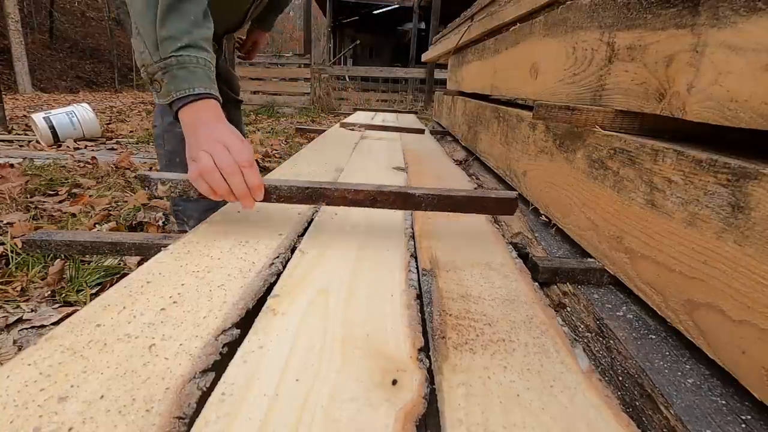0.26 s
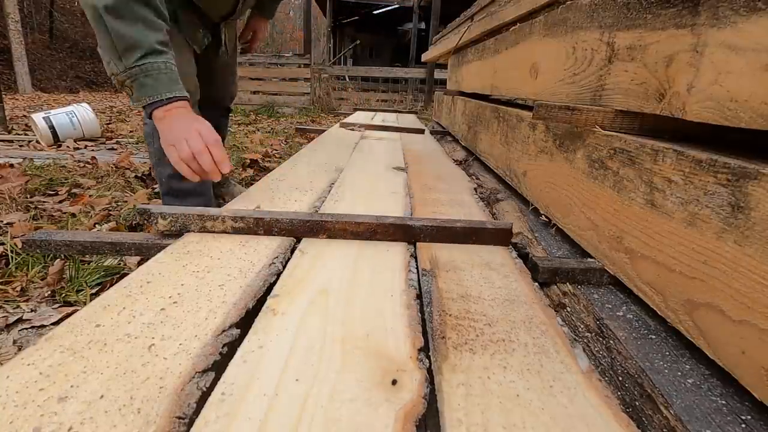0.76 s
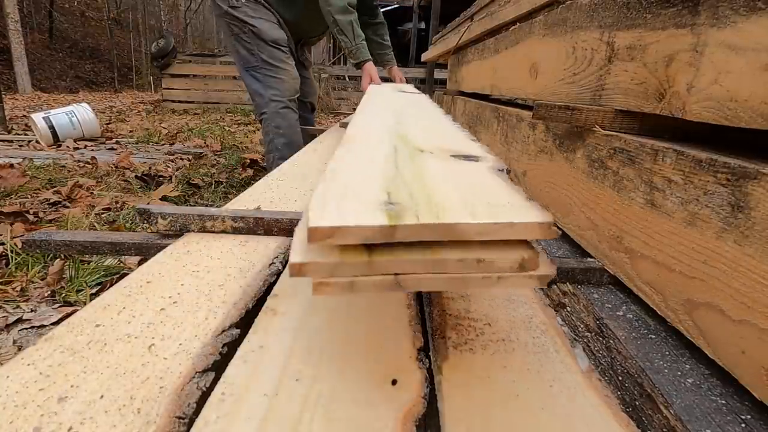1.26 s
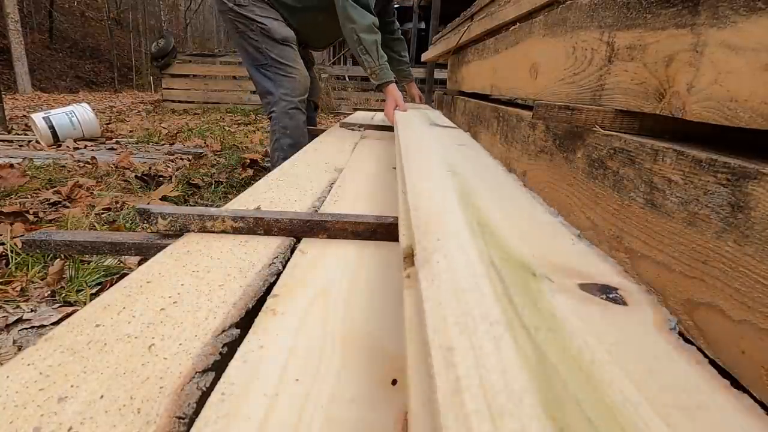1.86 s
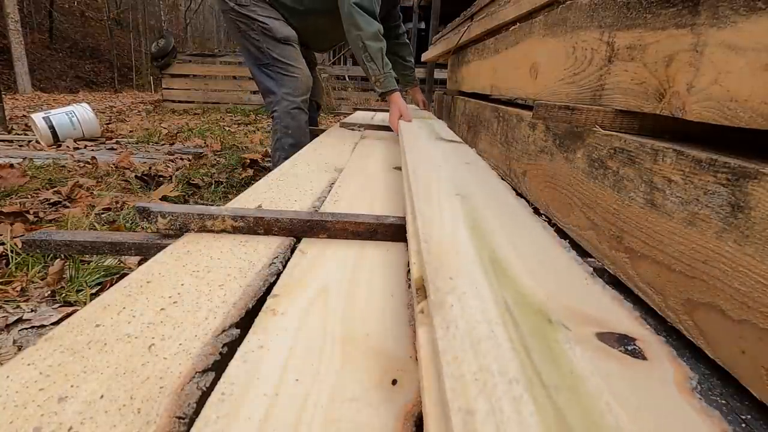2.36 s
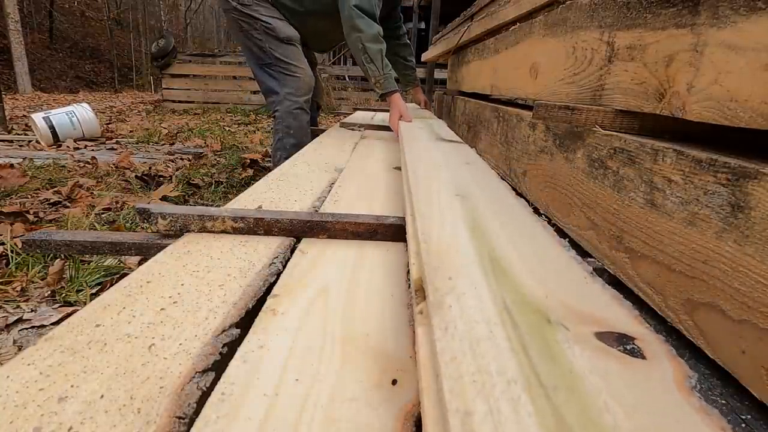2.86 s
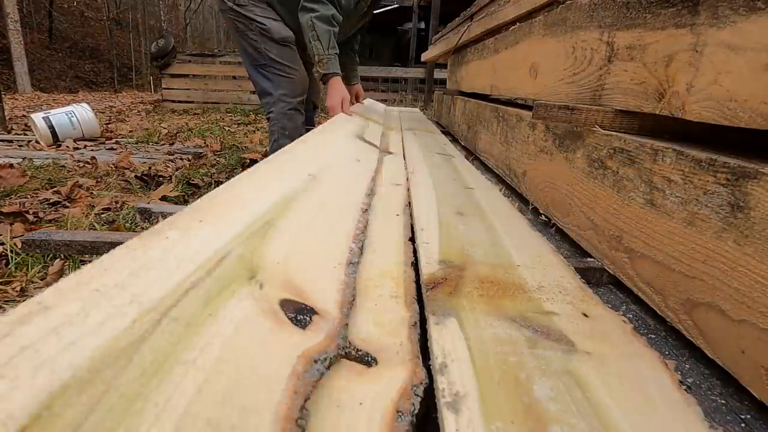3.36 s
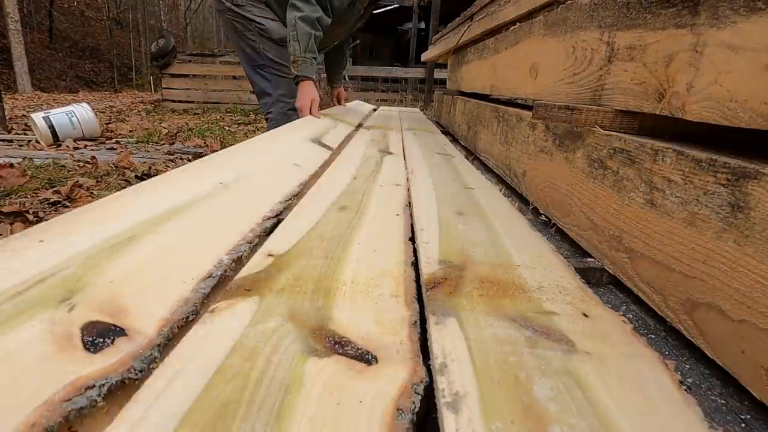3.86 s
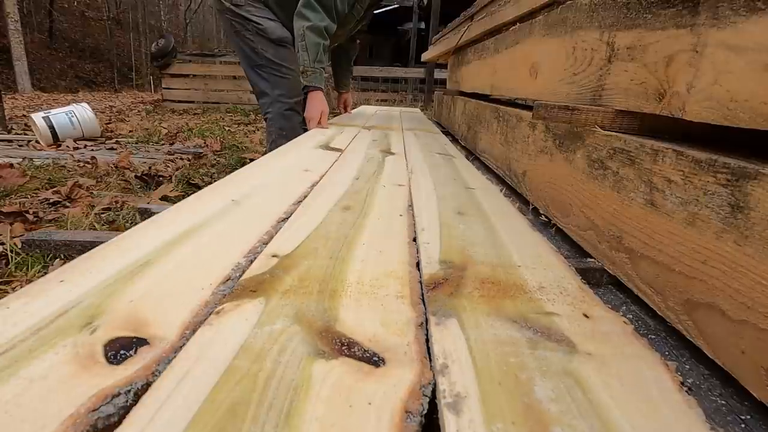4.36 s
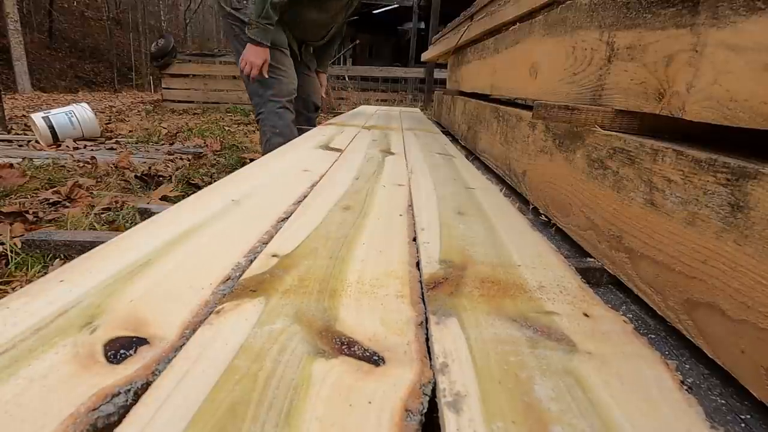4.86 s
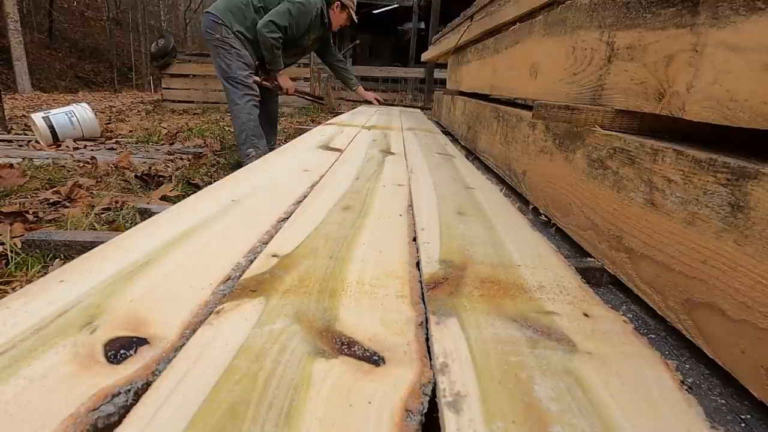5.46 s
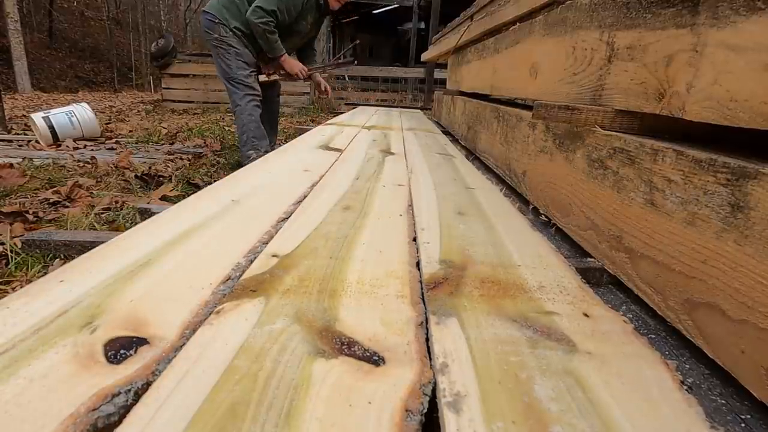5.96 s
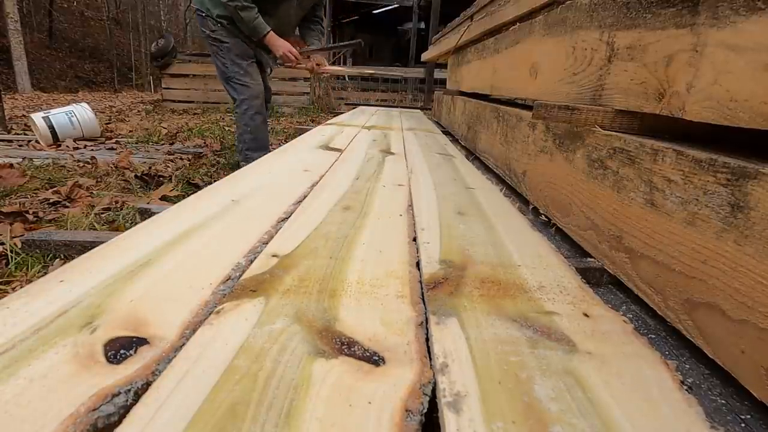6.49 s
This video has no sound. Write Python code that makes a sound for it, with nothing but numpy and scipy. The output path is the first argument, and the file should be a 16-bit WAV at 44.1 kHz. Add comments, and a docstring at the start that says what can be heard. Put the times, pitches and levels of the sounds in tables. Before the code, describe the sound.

Near the microphone, a wooden strip slaps onto boards with a quick cluster of knocks. Boots crackle in leaves and stalks snap. After near silence comes one crisp clack, a rough dry scrape swelling along the plank, then duller thuds as it drops and settles. Strips follow in two short clattering bursts, and the end fades to leaf crackle and small ticks in still, dry outdoor air.

```python
"""Sawn boards stacked by hand outdoors: wood blows ring bending modes through contact filters.
A spacer strip clatters down, a bundle is set on it, one plank scrapes sideways and drops, more strips land.
Scrapes are friction grains through the board's modes; slips are brief narrow noise rubs.
Boots crackle in dry leaves and cloth rustles (clumped grains), stalks snap (decaying noise bursts),
all over a steady hush of coloured noise."""
import sys
import numpy as np
from scipy import signal
from scipy.fft import rfft, irfft, next_fast_len
from scipy.io import wavfile
from scipy.ndimage import uniform_filter1d, minimum_filter1d, map_coordinates

SR = 44100
rng = np.random.default_rng(int(sys.argv[2]) if len(sys.argv) > 2 else 0)


def unload_wav(signal):
    """Save mono or channel-first audio to the path in sys.argv[1] as 16-bit WAV at rate SR, clipped to [-1, 1]."""
    wavfile.write(
        sys.argv[1],
        SR,
        np.round(np.clip(np.atleast_2d(signal).T, -1, 1) * 32767).astype(np.int16),
    )


N = 296793

# boots in dry leaves: (time [s], level [dB], length [s])
STEPS = [(0, -30, 0.056), (0.23, -50.5, 0.54), (0.859, -33.5, 0.12), (1.06, -42.5, 0.07),
         (1.288, -54, 0.22), (6.186, -41.5, .25), (6.473, -44.5, 0.35)]
STEP_ATTACK_S, STEP_FALL_DB_PER_S = 0.006, 104
# sleeves and trouser legs brushing: (time [s], level [dB], half length [s])
BRUSHES = [(.61, -44, 0.03), (.76, -48, 0.14), (5.02, -44.5, 0.083), (5.295, -40.5, 0.042),
           (5.39, -46.5, 0.21), (5.82, -53.5, 0.22), (6.04, -44.5, 0.038), (6.19, -47, 0.033)]
# colour of crushed leaves: (frequency [Hz], relative density [dB per Hz])
LEAF_COLOUR = [(60, -66), (150, -2), (260, 0.5), (580, 6.5), (950, -3.5), (1600, 0), (2300, 1),
               (3900, -0.5), (5700, -6), (8000, -14.5), (11500, -17), (14000, -27.5)]
# colour of brushed cloth: (frequency [Hz], relative density [dB per Hz])
CLOTH_COLOUR = [(60, -30), (200, 0.5), (600, 0.5), (950, -9), (1600, 2), (2800, 1), (4200, -0.5),
                (5800, -4.5), (8000, -12.5), (11500, -16), (14000, -29.5)]
# colour of still outdoor air: (frequency [Hz], relative density [dB per Hz])
AIR_COLOUR = [(25, -15), (90, -15), (130, -6.5), (190, 0), (330, -3.5), (600, 0.5), (950, -4.5), (2000, -3),
              (4000, -10), (5700, -16.5), (8000, -24.5), (11500, -26.5), (14000, -38)]
AIR_DB = -53.5
# twigs and leaf stalks snapping: (time [s], peak [dB], centre frequency [Hz])
SNAPS = [(0.057, -19.5, 3650), (0.139, -31, 3120), (0.685, -28, 4170), (.865, -32, 3040),
         (1.109, -24.5, 2720), (1.136, -41, 2720), (1.301, -37.5, 3170), (2.6874, -37.5, 3840),
         (6.001, -31.5, 4300), (6.369, -30.5, 2210), (6.401, -25.5, 2130), (6.676, -28.5, 4500)]
SNAP_T60_S = 0.037
# blows on the pile: strip falls, bundle eased on, top plank clacks, plank drops and rocks, more strips land:
# (time [s], level [dB], contact edge [Hz], lowest driven [Hz], ring length [factor],
#  place along board [0-1], rebound [gain 0-1])
KNOCKS = [ (0.4614, -31, 780, 530, 1.3, .9, 0), (0.4713, -12, 770, 183, 0.58, .092, 0.27),
          (0.4705, -26, 1850, 1200, 1, .6, 0), (0.4866, -15.5, 2820, 135, 0.3, 0.77, 0.3),
          (0.4928, -12, 1900, 172, 0.61, .31, 0.16), (0.5641, -31.5, 338, 80, 0.85, .26, 0.18),
          (0.5912, -39.5, 1340, 2000, .8, 0.7, 0.34), (2.242, -41, 328, 115, 0.59, .14, 0.37),
          (2.9631, -51.5, 2140, 55, 2.4, .8, 0.8), (3.005, -30, 3780, 1050, 1.1, 0.85, 0.13),
          (3.0436, -14, 4140, 1330, 0.86, .74, 0), (3.046, -33, 775, 250, 0.84, .4, 0),
          (4.0146, -20.5, 650, 226, 0.94, .88, 0.64), (4.0515, -30.5, 1320, 240, 0.17, 0.4, 0.66),
          (4.134, -22, 610, 129, 1.35, .659, 0.63), (4.2994, -18.5, 624, 187, 0.72, .31, 0.53),
          (4.412, -29.5, 570, 71, 0.43, .109, 0.49), (4.5665, -36, 460, 80, .65, 0.27, .2),
          (4.6382, -35, 620, 100, 1.7, .919, .4), (4.7006, -37.5, 304, 69.4, 0.47, 0.19, 0.13),
          (4.8121, -43.5, 485, 65, 0.28, .89, 0.44), (5.0141, -14, 550, 196, 0.94, 0.14, 0.23),
          (5.031, -18, 660, 194, 0.56, .276, 0.6), (5.072, -21, 900, 370, 0.46, .162, 0),
          (5.077, -14, 865, 210, 0.53, 0.43, 0.07), (5.3359, -39.5, 1500, 204, 0.72, 0.34, 0.2),
          (5.5939, -17.5, 1730, 1130, 1, 0.69, 0.3), (5.601, -17.5, 785, 215, 1.07, .188, 0.28),
          (5.627, -15.5, 780, 400, 0.47, .734, 0.3), (5.6974, -31.5, 575, 70, 1.06, .722, 0.12),
          (5.8382, -37.5, 270, 202, 0.5, 0, 0.14), (6.448, -41, 380, 185, 0.96, 0.02, 0.06)]
# bending modes of the stacked boards: (frequency [Hz], level [dB], t60 at ring factor 1 [s])
BOARD_MODES = [(93.3, -5.5, 0.57), (123.2, -8.5, 0.54), (171.3, -4, 0.2), (196.6, 0, 0.4), (230, 3.5, 0.15),
               (273.2, -0.5, 0.21), (301.3, -1.5, 0.21), (356.8, 3, 0.17), (399, -0.5, 0.15),
               (422, -18, 0.17), (428, -8, 0.035), (494, -6.5, 0.27), (572, -1, 0.18), (616, -0.5, 0.25),
               (695, -1.5, 0.11), (792, -4.5, 0.19), (858, -3.5, 0.26), (1019, -9, 0.045), (1258, 5, 0.067),
               (1365, -2.5, 0.17), (1460, -33, 0.08), (1736, 14, 0.026), (1817, -2, 0.12),
               (1946, 4.5, 0.029), (1990, 6, 0.27), (2423, 0, 0.078), (3030, -14, 0.1), (2970, 14.5, 0.019),
               (3615, 6.5, 0.043), (4130, 8.5, 0.076)]
# decay of the close-packed weak modes: (frequency [Hz], t60 at ring factor 1 [s])
CROWD_T60 = [(100, 0.61), (300, 0.57), (700, 0.2), (1500, 0.082), (3000, 0.018), (9000, 0.097)]
# first flight; each flight over the last; log-normal unevenness
BOUNCE_S, BOUNCE_SHRINK, BOUNCE_SCATTER = .024, 0.83, 0.1524
# loss at each further bounce; rebound band over that of the blow
BOUNCE_LOSS_DB, BOUNCE_DULL = 6.5, 0.68
# short slips as the plank is gripped and let go:
# (time [s], level [dB], half length [s], centre frequency [Hz])
SLIPS = [(3.192, -36.5, 0.0096, 1880), (3.232, -34, 0.0096, 1920), (3.329, -36, 0.016, 1900),
         (3.938, -30.5, 0.0035, 5960), (3.955, -31, 0.0035, 4600), (4.649, -44.5, 0.023, 1580)]
# top plank dragged sideways off the bundle: (time [s], friction level [dB], treble over that level [dB])
DRAG = [(3.28, -55, -9), (3.32, -49, -16), (3.352, -40.5, -6.5), (3.385, -26, -1.5), (3.42, -19.5, -16),
        (3.447, -17, -20), (3.46, -20.5, -1.5), (3.51, -20.5, 2), (3.55, -20, -5), (3.62, -21.5, -3.5),
        (3.69, -27, -11.5), (3.75, -33.5, -1), (3.78, -29, -12.5), (3.822, -42, -3.5), (3.866, -25.5, -9),
        (3.94, -31, -1), (3.97, -28, -24), (4.0, -45.5, -5.5)]
# the plank's body joins the rasp as it gets moving
BODY_START_DB, BODY_DB, BODY_BUILD_S = -30.5, -6.5, .19
# plank pushed home along its edge: (time [s], level [dB], half length [s])
SHOVES = [(4.265, -35.5, 0.06), (4.298, -28.5, .016), (4.435, -42.5, 0.027)]
# low colour of a sliding plank's body: (frequency [Hz], relative density [dB per Hz])
BODY_COLOUR = [(30, -41), (70, -8), (110, -5), (200, -4.5), (320, -3.5), (450, 1.5), (600, 5), (760, -17),
               (1000, -29), (1500, -41)]
# mid colour of sliding: (frequency [Hz], relative density [dB per Hz])
RASP_COLOUR = [(100, -64), (600, -10), (1000, -7), (1250, -2.5), (1750, 2), (2200, -3), (2700, -8),
               (3300, -18), (5000, -64), (9000, -51)]
# treble colour of sliding: (frequency [Hz], relative density [dB per Hz])
HISS_COLOUR = [(100, -58), (1800, -57), (2800, -2), (3400, -5.5), (3950, 1), (4700, -5), (6200, -11.5),
               (8000, -22.5), (11500, -26), (14000, -50)]
# microphone port response, with its notch: (frequency [Hz], gain [dB])
PORT = [(7400, 0), (8600, -7.5), (9100, -15), (9600, -6.5), (11500, 1.5), (12800, -4), (13800, -13)]
TOP_HZ = 14077


def amp(db):
    """Decibels to gain."""
    return 10 ** (np.asarray(db) / 20)


def unit(x):
    """Scale to rms 1."""
    return x / np.sqrt(np.mean(x ** 2) + 1e-20)


def along(points, hz):
    """Read (Hz, value) points on a log-frequency axis."""
    point_hz, value = np.transpose(points)
    return np.interp(np.log(hz + 1), np.log(point_hz + 1), value)


def filtered(x, response):
    """Apply a complex frequency response to x."""
    m = next_fast_len(len(x) + SR // 4)
    return irfft(rfft(x, m) * response(np.fft.rfftfreq(m, 1 / SR)), m)[:len(x)]


def coloured(x, spectrum):
    """Shape x by a (Hz, dB) colour, at rms 1."""
    return unit(filtered(x, lambda hz: amp(along(spectrum, hz))))


def slope(hz, edge_hz, kind, order):
    """Causal Butterworth low-pass or high-pass response."""
    return signal.freqs(*signal.butter(order, 1, kind, analog=True), hz / edge_hz)[1]


def resonance(hz, centre_hz, width_hz):
    """Causal response of one resonance."""
    return 1j * hz * width_hz / (centre_hz ** 2 - hz ** 2 + 1j * hz * width_hz)


def add(track, time_s, sound):
    """Mix a sound into the track at time_s."""
    start = max(round(time_s * SR), 0)
    track[start:start + len(sound)] += sound[:max(N - start, 0)]


def gains(rows):
    """Gain per sample for each dB column, fading to silence outside the rows."""
    times_s, *columns_db = np.transpose(rows)
    t = np.arange(N) / SR
    corners_s = [times_s[0] - .015, times_s[0], times_s[-1], times_s[-1] + 0.11]
    gate = np.interp(t, corners_s, [0, 1, 1, 0])
    return np.array([gate * amp(np.interp(t, times_s, db)) for db in columns_db])


def swells(rows):
    """Gain per sample of smooth strokes, summed as power, from (s, dB, half length s) rows."""
    t = np.arange(N) / SR
    power = sum(amp(db) ** 2 * np.exp(-((t - s) / half_s) ** 2) for s, db, half_s in rows)
    return np.sqrt(power)


def grains(rate_hz, spread_db, clump_db, clump_rate_hz):
    """Tiny impulses of random sign and uneven size, their level varying in clumps, at rms 1."""
    hits = (rng.random(N) < rate_hz / SR) * rng.choice([-1, 1], N)
    sizes = amp(spread_db * np.clip(rng.standard_normal(N), -2, 2))
    clumps = map_coordinates(rng.standard_normal(N // 20), [np.arange(N) * clump_rate_hz / SR])
    return unit(hits * sizes * amp(clump_db * clumps))


def wandering(x, depth_db):
    """As a contact moves along, different resonances swell and fade."""
    spectrum = signal.stft(x, nperseg=1024)[2]
    field = uniform_filter1d(rng.standard_normal(spectrum.shape), size=4, axis=0)
    field = uniform_filter1d(field, size=7, axis=1)
    return signal.istft(spectrum * amp(depth_db * unit(field)), nperseg=1024)[1][:N]


def tread(time_s, db, length_s):
    """One step: leaves are crushed at once, crackle while the weight comes on, then settle."""
    t = np.arange(N) / SR - time_s
    attack = np.clip(t / STEP_ATTACK_S, 0, 1)
    return attack * amp(db - STEP_FALL_DB_PER_S * np.maximum(t - length_s, 0))


def rustle():
    """Leaves crackle under the boots; cloth brushes with denser grains."""
    crackle = grains(rate_hz=2800, spread_db=4.8, clump_db=1.4, clump_rate_hz=130)
    crackle = coloured(wandering(crackle, depth_db=1.6), LEAF_COLOUR)
    swish = grains(rate_hz=5000, spread_db=4, clump_db=1.4, clump_rate_hz=90)
    swish = coloured(wandering(swish, depth_db=1.6), CLOTH_COLOUR)
    steps = np.max([tread(*step) for step in STEPS], axis=0)
    return steps * crackle + swells(BRUSHES) * swish


def outdoor_air():
    """Still air: steady coloured noise."""
    return amp(AIR_DB) * coloured(rng.standard_normal(N), AIR_COLOUR)


def snaps(relative_width=0.25):
    """Dry stalks break with a short, bright tick: a decaying noise burst through one resonance."""
    out, t = np.zeros(N), np.arange(SR // 16) / SR
    for s, peak_db, centre_hz in SNAPS:
        burst = rng.standard_normal(len(t)) * amp(-60 * t / SNAP_T60_S)
        stalk = lambda hz: resonance(hz, centre_hz, relative_width * centre_hz)
        band = lambda hz: slope(hz, 1000, "high", order=2) * slope(hz, 10600, "low", order=2)
        tick = filtered(burst, lambda hz: stalk(hz) * band(hz))
        add(out, s, amp(peak_db) * tick / np.abs(tick).max())
    return out


def board_ring(ring, place, crowd_db=-7, push_db=-5, scatter_db=3.3):
    """The pile's answer to one blow: a first push, its strong modes and a crowd of weak ones."""
    t = np.arange(SR // 2) / SR
    hz, db, t60_s = np.transpose(BOARD_MODES)[:, :, None]
    # place sets the strength and sign of each mode
    order = np.arange(2, len(BOARD_MODES) + 2)
    shape = np.sin(np.pi * np.clip(place, .03, .97) * order)[:, None]
    life_s = np.minimum(t60_s * ring, 110 / hz)  # inner friction: at most 110 cycles to -60 dB
    level_db = db + rng.normal(0, scatter_db, db.shape) - 60 * t / life_s
    modes = np.sum(shape * amp(level_db) * np.sin(2 * np.pi * hz * t), 0)

    bin_hz, when_s, noise = signal.stft(rng.standard_normal(len(t)), SR, nperseg=128)
    crowd_life_s = ring * along(CROWD_T60, bin_hz)[:, None]
    crowd = signal.istft(noise * amp(-60 * when_s / crowd_life_s), SR, nperseg=128)[1][:len(t)]

    push = signal.unit_impulse(len(t))
    # equal energy, weighted below 1.5 kHz, before the levels
    even = lambda x: x / np.linalg.norm(filtered(x, lambda f: slope(f, 1500, "low", order=2)))
    return even(modes) + amp(crowd_db) * even(crowd) + amp(push_db) * even(push)


def blow(edge_hz, low_hz, ring, place, crack_db=-34, thud_db=-24):
    """Wood lands on wood; soft, flat contacts are dull, edge contacts are sharp."""
    # dispersive bending waves: treble runs ahead of bass, 1 kHz arrives 1.6 ms late
    travel = lambda hz: np.exp(-4j * np.pi * .0016 * np.sqrt(hz * 1000))
    crack = lambda hz: amp(crack_db) * slope(hz, 2.0 * edge_hz, "low", order=3)
    contact = lambda hz: slope(hz, edge_hz, "low", order=6) + crack(hz)
    thud = lambda hz: amp(thud_db) * slope(hz, 68, "high", order=2)
    reach = lambda hz: slope(hz, low_hz, "high", order=3) + thud(hz)
    sound = filtered(board_ring(ring, place), lambda hz: contact(hz) * reach(hz) * travel(hz))
    return sound / np.std(sound[:SR // 50])  # level set over the first 20 ms


def bounces(hz, count=4):
    """Response of a run of rebounds, on average sooner each time, and always weaker."""
    k = np.arange(count)
    flights_s = BOUNCE_S * BOUNCE_SHRINK ** k * np.exp(BOUNCE_SCATTER * rng.standard_normal(count))
    delays_s = np.cumsum(flights_s)
    return amp(-BOUNCE_LOSS_DB * k) @ np.exp(-2j * np.pi * np.outer(delays_s, hz))


def knocks():
    """Each blow rings the pile; a loose piece then chatters, more softly, on its other end."""
    out = np.zeros(N)
    for s, db, edge_hz, low_hz, ring, place, rebound in KNOCKS:
        first = blow(edge_hz, low_hz, ring, place)
        other_end = blow(BOUNCE_DULL * edge_hz, BOUNCE_DULL * low_hz, ring, 1 - place)
        chatter = filtered(other_end, bounces)
        add(out, s, amp(db) * (first + rebound * chatter))
    return out


def yard(x, wet_db, t60_s):
    """The timber stack, shed and trees scatter a faint, dark tail: decaying noise, convolved."""
    t = np.arange(SR // 2) / SR
    colour = [(60, 0), (400, 0), (1500, -12), (4000, -19), (10000, -26)]  # (Hz, dB)
    tail = coloured(rng.standard_normal(len(t)), colour)
    tail = tail * amp(-60 * t / t60_s) * (1 - np.exp(-t / 0.025))  # 25 ms build-up
    return amp(wet_db) * signal.fftconvolve(x, tail / np.linalg.norm(tail))[:N]


def slips(relative_width=0.59):
    """Brief rubs that swell and stop, each noise around one pitch."""
    out = np.zeros(N)
    for s, db, half_s, centre_hz in SLIPS:
        band = lambda hz: resonance(hz, centre_hz, relative_width * centre_hz) ** 2
        rub = filtered(rng.standard_normal(N), band)
        out += swells([(s, db, half_s)]) * unit(rub)
    return out


def through_board(x, ring_db):
    """Friction shakes the modes as well as the air; the plank above holds the strongest down."""
    def modes(f):
        total = 0
        for k, (hz, db, t60_s) in enumerate(BOARD_MODES):
            width_hz = np.log(1000) / np.pi / t60_s
            total = total + (-1) ** k * amp(np.minimum(db, 2)) * resonance(f, hz, width_hz)
        return total
    return x + amp(ring_db) * filtered(x, modes)


def slides(hiss_db=-.5, shove_hiss_db=-15):
    """Rough sawn fibres catch and let go thousands of times a second."""
    catches = grains(rate_hz=7000, spread_db=3, clump_db=1.3, clump_rate_hz=280)
    catches = wandering(through_board(catches, ring_db=-4), depth_db=2.1)
    body = coloured(catches, BODY_COLOUR)
    rasp = coloured(catches, RASP_COLOUR)
    hiss = coloured(catches, HISS_COLOUR)
    friction, treble = gains(DRAG)
    since_start_s = np.arange(N) / SR - DRAG[0][0]
    body_db = np.interp(since_start_s, [0, BODY_BUILD_S], [BODY_START_DB, BODY_DB])
    drag = friction * (amp(body_db) * body + rasp + amp(hiss_db) * treble * hiss)
    shoves = swells(SHOVES) * (rasp + amp(shove_hiss_db) * hiss)
    return drag + shoves


def limited(x, ceiling):
    """Look-ahead limiter: gain ducks for a few milliseconds around peaks above the ceiling."""
    needed = np.minimum(1, ceiling / (np.abs(x) + 1e-9))
    held = minimum_filter1d(needed, SR // 200)
    return x * uniform_filter1d(held, SR // 200)


def scene():
    """Wood and its yard tail, the worker's movements and the outdoor hush."""
    wood = knocks() + slips() + slides()
    tail = yard(wood, wet_db=-29, t60_s=0.15)
    return (rustle() + outdoor_air() + snaps() + wood + tail)[None]


def record(dry):
    """Peaks are limited, the microphone port notches the treble, nothing passes above TOP_HZ."""
    held = limited(dry[0], ceiling=.84)
    return filtered(held, lambda hz: amp(along(PORT, hz)) * (hz < TOP_HZ))[None]


dry = scene()
out = record(dry)
unload_wav(out)
```